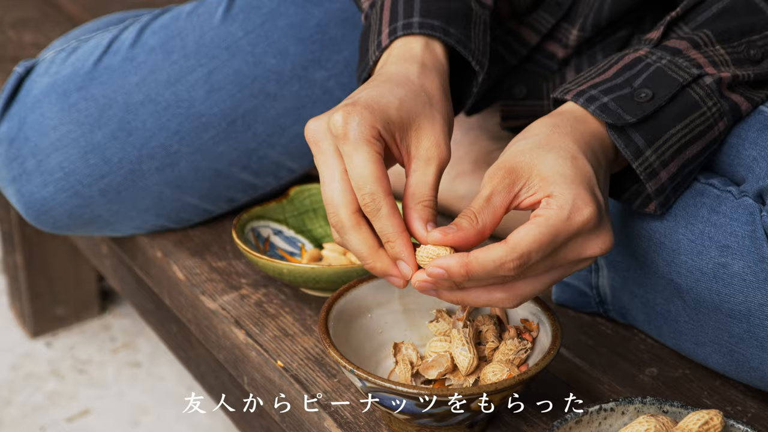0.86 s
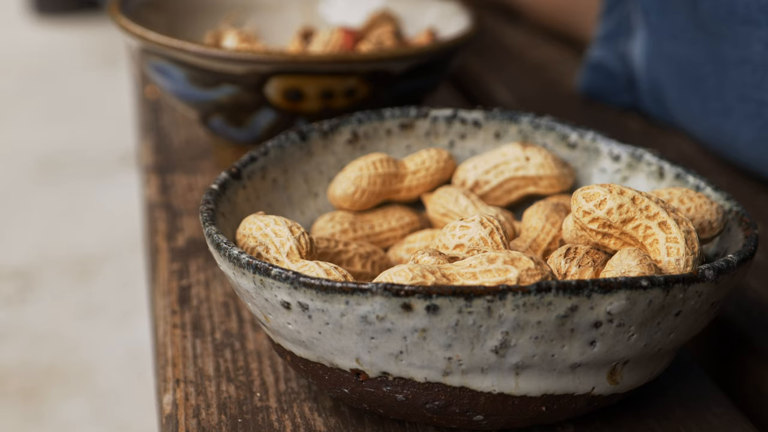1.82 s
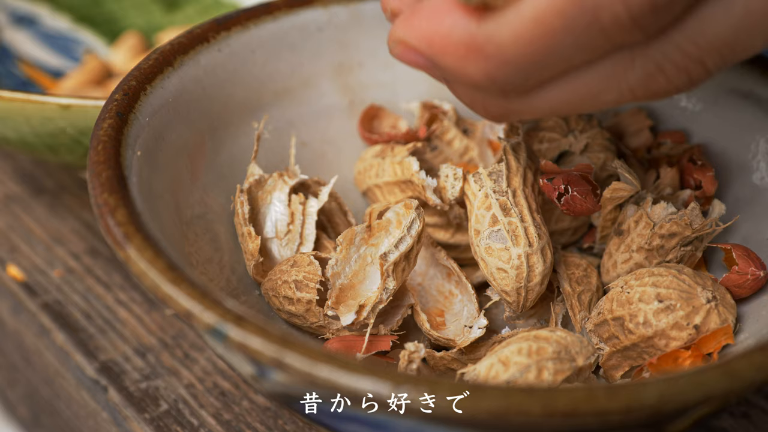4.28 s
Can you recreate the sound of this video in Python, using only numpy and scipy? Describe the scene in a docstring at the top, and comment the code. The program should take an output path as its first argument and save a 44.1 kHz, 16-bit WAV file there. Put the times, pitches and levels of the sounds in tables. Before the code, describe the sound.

Dry peanut shells snap and crinkle close by as they are opened by hand, with crickets droning softly outdoors.

```python
"""Dry peanut pods snap and crinkle close by, shelled by hand over a ceramic bowl on a bench outdoors.
Each brittle fracture excites the resonances of the pod's wall and hollow; stick-slip friction makes
fingers rasp and shells creak. Bumps and rubs sound the wooden bench's low modes; the bowl rings faintly.
Crickets stridulate all around: near ones in short runs of falling pulses, far ones as a droning chorus."""
import sys
import numpy as np
from scipy import signal
from scipy.fft import rfft, irfft, next_fast_len
from scipy.io import wavfile
from scipy.ndimage import uniform_filter1d, map_coordinates

SR = 44100
rng = np.random.default_rng(int(sys.argv[2]) if len(sys.argv) > 2 else 0)


def persist_wave(psi):
    """Save psi, clipped to +-1, as 16-bit WAV."""
    counts = np.round(np.clip(psi, -1, 1) * 32767).astype(np.int16)
    wavfile.write(sys.argv[1], SR, np.atleast_2d(counts).T)


N = 255778

# pod fractures: t/s, hollow f/Hz, wall f/Hz, then level/dB over 5 ms of hollow, wall, crack, splinter
POD_FRACTURES = [(0.029, 2010, 3320, -45, -25.5, -34, -37), (0.041, 1870, 3450, -60, -41, -46, -54),
                 (0.0729, 1420, 3150, -48, -40.5, -34, -41), (0.1104, 1550, 3470, -40, -31, -23, -36),
                 (0.1129, 1930, 2830, -38, -29, -29.5, -41), (.137, 2090, 3950, -61, -45, -38, -41),
                 (.207, 1400, 3200, -54, -42, -45, -42.5), (.282, 2110, 3420, -55, -44.5, -38.5, -41.5),
                 (0.3747, 1420, 3160, -54, -43, -46.5, -48), (0.4486, 1340, 3270, -40, -42.5, -41, -39.5),
                 (1.06, 2090, 3680, -56, -38, -34, -40.5), (1.1, 1780, 2650, -29.5, -26, -17, -21),
                 (1.1014, 1900, 3770, -32, -24, -31, -28), (1.1049, 2090, 3500, -35.5, -25, -24, -35),
                 (1.1066, 1640, 3370, -37, -22, -21.5, -32), (1.1237, 1660, 3960, -42, -36.5, -35, -38),
                 (1.135, 2050, 3750, -47, -36, -43, -39), (1.1615, 1960, 3530, -43, -30, -41, -42),
                 (1.1651, 1350, 3930, -34.5, -25, -26.5, -27.5),
                 (2.2598, 1030, 3630, -46.5, -41, -50.5, -49), (2.4582, 1270, 3750, -53, -33, -34, -31),
                 (2.8745, 1080, 3490, -34, -15, -23, -18.5), (2.91, 2130, 3570, -38, -20, -28.5, -30),
                 (2.925, 1870, 3660, -57, -38, -50.5, -47), (3.0396, 1920, 3940, -43, -29, -31, -37),
                 (3.0798, 1100, 3210, -22.5, -14, -20, -28.5),
                 (3.688, 1320, 3380, -43.5, -36.5, -50.5, -68),
                 (4.5982, 1810, 2930, -45.5, -43, -48.5, -56), (4.8336, 1850, 3420, -40, -40, -40.5, -44.5)]
# thin flakes of husk breaking off: t/s, level/dB
FLAKE_BREAKS = [(.091, -43), (.389, -41), (.711, -51.5), (1.012, -45), (2.4664, -36), (3.0035, -43),
                (3.026, -41), (3.0729, -22.5), (3.312, -48), (4.032, -43), (4.054, -47), (4.072, -42),
                (4.09, -41.5), (4.373, -34.5), (4.381, -37), (4.398, -34), (4.404, -36.5), (4.44, -36.5),
                (4.512, -36), (4.592, -37), (4.627, -27), (4.64, -31), (4.665, -19.5), (4.685, -31),
                (5.275, -27.5), (5.324, -36), (5.331, -32.5)]
# a pod squeezed until it creaks: t/s, duration/s, f/Hz, relative level/dB
POD_CREAKS = [(4.411, .008, 1570, -51), (4.474, .1, 1600, -54), (5.31, .015, 2070, -47.5),
              (5.366, .05, 2490, -56.5), (5.488, .03, 1980, -58)]
# finger movements: t/s, duration/s, level/dB
HUSK_SQUEEZES = [(0, .17, -49.5), (.28, 0.075, -49.5), (.36, 0.063, -52), (.96, .13, -59.5),
                 (1.1, 0.052, -39), (1.86, 0.11, -58), (2.23, 0.31, -61.5), (2.57, 0.27, -60),
                 (2.87, 0.1, -58), (2.97, 0.093, -49), (3.55, 0.17, -61.5), (3.97, 0.122, -53.5),
                 (4.32, 0.072, -50.5), (4.48, 0.25, -59.5), (5.18, 0.28, -58)]
FINGER_RUBS = [(0.11, 0.15, -51), (.29, 0.053, -54), (1.522, 0.28, -56), (1.86, 0.058, -53.5),
               (2.208, 0.11, -47), (2.33, 0.2, -53.5), (3.093, .06, -69), (3.218, 0.049, -49.5),
               (4.94, 0.035, -54), (5.3, 0.12, -58)]
SEED_SKIN_SLIDES = [(1.52, 0.15, -57.5), (1.86, 0.21, -65), (3.885, 0.038, -54), (4.13, 0.072, -58.5),
                    (4.835, 0.064, -61), (5.33, .1, -57), (5.55, 0.083, -50), (5.64, 0.068, -63),
                    (5.74, 0.15, -55.5)]
# short soft bumps and longer low rubs on the bench: t/s, level/dB, t60/s, band centre f/Hz
BENCH_BUMPS_AND_SLIDES = [(1.581, -47.5, 0.37, 490), (1.599, -45.5, 0.48, 119), (1.852, -35, 0.056, 235),
                          (1.947, -40, 0.049, 170), (2.03, -53, 0.17, 353), (3.429, -43.5, 0.33, 500),
                          (3.525, -35, 0.16, 320), (3.549, -44, 0.27, 304), (3.753, -55, .08, 120)]
# resonant modes: f/Hz, bandwidth/Hz, gain/dB
BENCH_MODES = [(125, 17, -2.5), (248, 49, -4.5), (385, 48, -5.5), (517, 170, -11.5)]
BOWL_MODES = [(1130, 420, -7.5), (2666, 60, 2), (3100, 110, 0), (4520, 2100, -17)]
# the long ring of the glazed bowl: f/Hz, relative level/dB, t60/s
BOWL_PARTIALS = [(1590, -3.5, 1), (8823, -1, 0.38), (9700, -4, 0.47), (12425, -11, 0.28), (14200, -10, .25)]
# runs of the near crickets: t/s, chirp count, period/s, f/Hz, fractional fall in pitch, relative level/dB
CHIRP_RUNS = [(.69, 4, 0.1, 3580, 0.1, -57.5), (1.354, 6, 0.098, 3630, 0.07, -48.5),
              (1.917, 1, .06, 3450, .04, -50), (2.097, 2, 0.063, 3560, 0.06, -50.5),
              (2.35, 2, 0.053, 3600, 0.03, -51.5), (2.555, 3, .058, 3540, .045, -54),
              (4.445, 3, 0.073, 3540, 0.06, -49.5), (4.777, 2, 0.063, 3540, 0.05, -49.5)]
# far crickets: t/s, relative level/dB of the low singers, relative level/dB of the high singers
CHORUS_LEVELS = [(0.0, -57, -58), (0.37, -56, -59.5), (2.32, -53, -60), (3.94, -56.5, -59.5),
                 (4.44, -57, -62), (5.8, -59.5, -59.5)]
# a faint far hum: f/Hz, level/dB
HUM_PARTIALS = [(135, -74.5), (406, -75.5)]
# shapes of spectral density: f/Hz, relative level/dB
FLAKE_SPECTRUM = [(300, -47), (900, -16), (2000, -15), (3200, -5.5), (5500, -10), (9000, -0.5), (13000, 4),
                  (16000, 5)]
HUSK_SPECTRUM = [(500, -24), (1500, -9.5), (3000, -7), (7000, -0.5), (10000, -4.5), (13500, -6.5),
                 (15700, -6), (16500, -26)]
FINGER_SPECTRUM = [(150, -29), (500, -9.5), (1000, -3), (1800, -9), (3000, 4), (5000, -8), (12000, -17)]
SEED_SKIN_SPECTRUM = [(2000, -7.5), (5000, -5), (8500, 1.5), (12000, -5), (15000, 2), (16200, -28)]
AIR_SPECTRUM = [(20, -2), (60, -3.5), (125, -1), (220, -5), (400, -11.5), (800, -15), (1500, -20),
                (2700, -20), (5500, -27), (9000, -33.5), (15500, -34), (15900, -56)]
# reverberation time of the surroundings: f/Hz, t60/s
YARD_DECAY = [(200, 0.34), (1800, 0.24), (3200, .16), (5000, 0.26), (9000, 0.16), (16000, 0.12)]


def snaps(lead_s=.004, lead_db=-19, run_on_s=.015, run_on_db=-24.5):
    """Crack propagation: one small break precedes each fracture, and two follow as the split runs on."""
    out = np.zeros(N)
    for s, *voice in POD_FRACTURES:
        add(out, s - .0002, fracture(*voice))
        add(out, s - lead_s * rng.random(), amp(lead_db) * fracture(*voice))
        for delay in run_on_s * rng.random(2):
            add(out, s + delay, amp(run_on_db) * fracture(*voice))
    return out


def fracture(hollow_hz, wall_hz, hollow_db, wall_db, crack_db, splinter_db):
    """Impulse excitation: a sudden release rings the pod's wall and the hollow of pod and hands."""
    t = clock(.03)
    tear = tearing(t)
    release = tear + 11 * (t == 0)  # the one sudden push of the opening shell
    hollow_modes = [(hollow_hz, 340, 0), (hollow_hz * 1.87, 300, -5), (hollow_hz * .7, 300, -13)]
    wall_modes = [(wall_hz, 400, 0), (wall_hz * .766, 400, -9), (wall_hz * 1.042, 450, -11)]
    hollow = burst(resonate(band(release, 780, 2300), hollow_modes), hollow_db)
    wall = burst(resonate(band(release, 2250, 4800), wall_modes), wall_db)
    thud = burst(band(tear, 354, 617), hollow_db - 16.5)
    crack = burst(band(tear, 5100, 9180), crack_db)
    splinter = burst(band(tear, 8930, 15500), splinter_db)
    return hollow + wall + thud + crack + splinter


def tearing(t):
    """Stress release: a break builds up within a millisecond, then fibres give way for a few more."""
    envelope = fade(t, .0059) * (1 - fade(t, .003)) + amp(-13) * fade(t, .013)
    return rng.standard_normal(len(t)) * envelope


def flakes():
    """Brittle fracture without resonance: flakes too small to ring each break with one bright tick."""
    out, t = np.zeros(N), clock(.03)
    for s, db in FLAKE_BREAKS:
        tear = np.pad(tearing(t) * fade(t, .025), (SR // 1000, 0))
        add(out, s - .0012, burst(coloured(tear, FLAKE_SPECTRUM), db))
    return out


def creaks(slip_period_s=.0105):
    """Stick-slip friction: shell halves catch on each other at an uneven rate, each slip a dull tick."""
    out, t = np.zeros(N), clock(.012)
    for s, length, hz, db in POD_CREAKS:
        for delay in np.arange(0, length, slip_period_s):
            slip = rng.standard_normal(len(t)) * fade(t, .011)
            tick = unit(resonate(slip, [(hz, 700, 0), (hz * 1.32, 700, -8)]))
            jitter_s = .0015 * rng.standard_normal()
            add(out, s + delay + jitter_s, amp(db - .5 + 2 * rng.standard_normal()) * tick)
    return out


def crinkle(breaks_per_s=230, holding_db=-72):
    """Acoustic emission: squeezed husk fibres break in uneven clicks, coloured by the changing grip."""
    breaks = (rng.random(N) < breaks_per_s / SR) * amp(4.5 * np.minimum(rng.exponential(size=N), 3.5))
    power = np.abs(signal.fftconvolve(breaks ** 2, fade(clock(.01), .0053) ** 2)[:N])
    grains = unit(np.sqrt(power) * rng.standard_normal(N)) + .073 * rng.standard_normal(N)
    grip = amp(holding_db) + strokes(HUSK_SQUEEZES)
    return grip * coloured(patchy(grains, depth_db=4.5), HUSK_SPECTRUM)


def rubs():
    """Friction noise: fingertips rasp over the ribbed pod; papery seed skins slide with a finer hiss."""
    fingers = strokes(FINGER_RUBS) * coloured(grainy(rough_db=5), FINGER_SPECTRUM)
    seed_skins = strokes(SEED_SKIN_SLIDES) * coloured(grainy(rough_db=4), SEED_SKIN_SPECTRUM)
    return fingers + seed_skins


def bench(onset_hz=193, onset_db=-3):
    """Damped vibration: short soft bumps and longer low rubs sound the bench's low modes."""
    out, t = np.zeros(N), clock(.4)
    onset = amp(onset_db) * np.sin(2 * np.pi * onset_hz * t) * fade(t, t60=.03)
    for s, db, t60, hz in BENCH_BUMPS_AND_SLIDES:
        modes = resonate(rng.standard_normal(len(t)), BENCH_MODES)
        plank = unit(band(modes, .53 * hz, 1.73 * hz))
        envelope = fade(t, t60) * (1 - fade(t, .0048))
        add(out, s, amp(db) * (plank * envelope + onset))
    return out


def bowl_scrape(s=3.429, db=-43, t60=.43):
    """Forced vibration: a brief scrape on the wood drives the modes of the bowl."""
    drag, t = np.zeros(N), clock(.2)
    add(drag, s, amp(db) * fade(t, t60) * (1 - fade(t, .053)))
    return drag * unit(resonate(rng.standard_normal(N), BOWL_MODES))


def bowl_ping(s=3.582, db=-60):
    """Free vibration: a dropped nut leaves the glazed bowl ringing in faint inharmonic partials."""
    out, t = np.zeros(N), clock(.46)
    for hz, partial_db, t60 in BOWL_PARTIALS:
        add(out, s, amp(db + partial_db) * np.sin(2 * np.pi * hz * t) * fade(t, t60))
    return out


def near_crickets(swell_db=7, stroke_s=.036):
    """Stridulation in runs that swell and fade: each chirp is a wing stroke and a lower, shorter one."""
    out = np.zeros(N)
    for start, count, period, hz, fall, peak_db in CHIRP_RUNS:
        for k in range(int(count)):
            s = start + k * period
            from_middle = (2 * k + 1) / count - 1
            db = peak_db - swell_db * from_middle ** 2
            add(out, s - stroke_s / 2, amp(db + 3.5) * wing_stroke(hz, stroke_s, fall))
            add(out, s + .0063, amp(db + 4) * wing_stroke(hz * (1 - fall), .0293, fall))
    return out


def wing_stroke(hz, length, fall):
    """Tooth rate sets pitch: the tone sags as the wing's scraper slows and wavers over the file."""
    t = clock(length)
    waver = unit(uniform_filter1d(rng.standard_normal(len(t)), size=50))
    pitch = hz * (1 - fall * (t / length - .5) + .014 * waver)
    return np.hanning(len(t)) * np.sin(2 * np.pi * np.cumsum(pitch) / SR)


def chorus():
    """Superposition: far crickets drone in four pitch groups, with a soft hiss an octave over the lowest."""
    low_db, high_db = curves(CHORUS_LEVELS)
    low = unit(singers(3400, spread=.0904, count=2400) + .85 * singers(3750, spread=.097, count=1800))
    high = unit(singers(4130, spread=.0973, count=1800) + .92 * singers(4500, spread=.0568, count=1800))
    octave = unit(band(rng.standard_normal(N), 6410, 7400))
    low_gain = amp(low_db - 1.14 + 1.1 * wobble(8.7))
    high_gain = amp(high_db - .8 + 1.5 * wobble(5.8))
    return low_gain * (low + amp(-15.5) * octave) + high_gain * high


def singers(hz, spread, count):
    """Incoherent summation: wing strokes at scattered times and pitches merge into a shimmer."""
    out = np.zeros(N)
    for position, sharp, flat in rng.random((count, 3)):
        pitch = hz * (1 + spread * (sharp - flat))
        add(out, position * N / SR - .01, wing_stroke(pitch, length=.028, fall=.061))
    return unit(out)


def air():
    """Ambient noise: faint rumble and hiss, with a far hum wavering in amplitude and phase."""
    t = np.arange(N) / SR
    hum = sum(amp(db + 3 * wobble(1.84)) * unit(np.sin(2 * np.pi * hz * t + 1.25 * wobble(7.1)))
              for hz, db in HUM_PARTIALS)
    return hum + amp(-57 + wobble(3.5)) * coloured(rng.standard_normal(N), AIR_SPECTRUM)


def yard(x):
    """Reverberation: the surroundings return a diffuse tail whose treble dies first."""
    hz, t, noise = signal.stft(rng.standard_normal(SR // 2), SR, nperseg=256)
    tail = signal.istft(noise * fade(t, along(YARD_DECAY, hz)[:, None]), SR, nperseg=256)[1]
    return signal.fftconvolve(x, tail / np.linalg.norm(tail))[:N]


def strokes(rows):
    """Amplitude envelope: each finger stroke rises, holds and falls."""
    out = np.zeros(N)
    for s, length, db in rows:
        add(out, s, amp(db) * np.sqrt(signal.windows.tukey(int(length * SR), .6)))
    return out


def grainy(rough_db):
    """Roughness: noise under fast random amplitude modulation."""
    return rng.standard_normal(N) * amp(rough_db * wobble(220))


def patchy(x, depth_db):
    """Spectral modulation: the colour of x shifts from moment to moment."""
    spectra = signal.stft(x, nperseg=512)[2]
    field = uniform_filter1d(rng.standard_normal(spectra.shape), size=9, axis=0)
    field = uniform_filter1d(field, size=12, axis=1)
    return signal.istft(spectra * amp(depth_db * unit(field)), nperseg=512)[1][:N]


def resonate(x, modes):
    """Modal summation: x drives resonances (f/Hz, bandwidth/Hz, gain/dB) of alternating sign."""
    def response(f):
        return sum((-1) ** k * amp(db) * 1j * f * width / (hz * hz - f * f + 1j * f * width)
                   for k, (hz, width, db) in enumerate(modes))
    return filtered(x, response)


def coloured(x, spectrum):
    """Spectral shaping, normalised to rms 1."""
    return unit(filtered(x, lambda hz: amp(along(spectrum, hz))))


def filtered(x, response):
    """Linear filtering: the spectrum of x times a frequency response."""
    size = next_fast_len(len(x) + 8192)
    return irfft(rfft(x, size) * response(np.fft.rfftfreq(size, 1 / SR)), size)[:len(x)]


def band(x, lo_hz, hi_hz):
    """Causal band-pass filtering."""
    return signal.sosfilt(signal.butter(3, [lo_hz, hi_hz], "band", fs=SR, output="sos"), x)


def burst(x, db):
    """Equivalent level: x scaled to db, its energy counted over 5 ms."""
    return amp(db) * x / np.sqrt(np.sum(x ** 2) / (.005 * SR))


def wobble(rate):
    """Smooth random modulation, with rate knots a second."""
    return map_coordinates(rng.standard_normal(int(N * rate / SR) + 4), [np.arange(N) * rate / SR])


def along(points, hz):
    """Interpolation of (f/Hz, value) points on a log frequency axis."""
    f, values = np.transpose(points)
    return np.interp(np.log(hz + 1), np.log(f + 1), values)


def curves(rows):
    """Interpolation in time: one value per sample for each column after t/s."""
    times, *columns = np.transpose(rows)
    return [np.interp(np.arange(N) / SR, times, column) for column in columns]


def fade(t, t60):
    """Exponential decay of 60 dB in t60."""
    return np.exp(-np.log(1000) * t / t60)


def add(track, s, sound):
    """Superposition of a sound on the track at time s."""
    start = int(np.clip(s * SR, 0, N - 1))
    track[start:start + len(sound)] += sound[:N - start]


def clock(length):
    return np.arange(int(length * SR)) / SR


def amp(db):
    return 10 ** (np.asarray(db) / 20)


def unit(x):
    return x / np.sqrt(np.mean(x ** 2) + 1e-20)


def scene():
    """Direct-to-reverberant ratio conveys distance: the shelling is close, the crickets further off."""
    shelling = snaps() + flakes() + creaks() + crinkle() + rubs() + bench() + bowl_scrape() + bowl_ping()
    chirps = near_crickets()
    reverberation = amp(-19.5) * yard(shelling) + amp(-4) * yard(chirps)
    return (shelling + chirps + reverberation + chorus() + air())[None]


def record(dry, cutoff_hz=16100):
    """Band limiting: a steep low-pass removes the highest treble."""
    return filtered(dry[0], lambda hz: 1 / np.sqrt(1 + (hz / cutoff_hz) ** 160))[None]


dry = scene()
out = record(dry)
persist_wave(out)
```